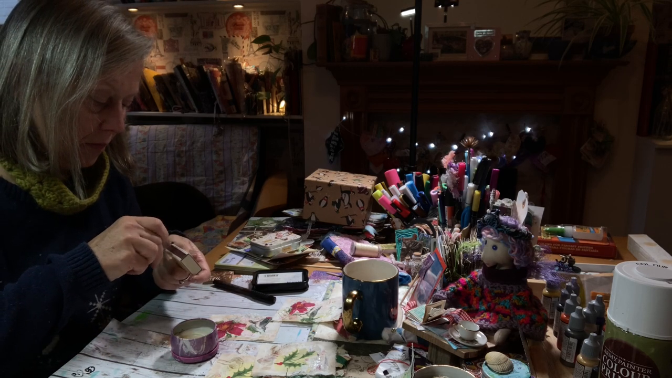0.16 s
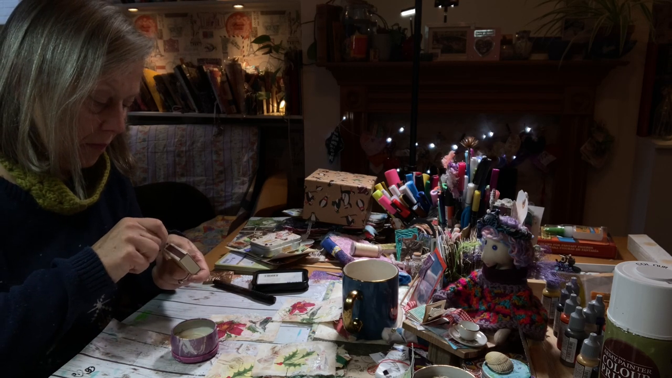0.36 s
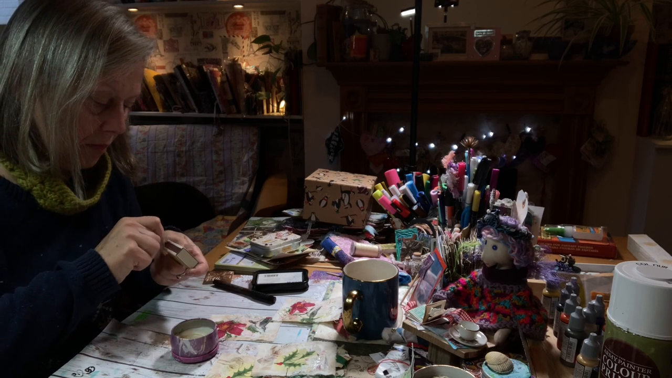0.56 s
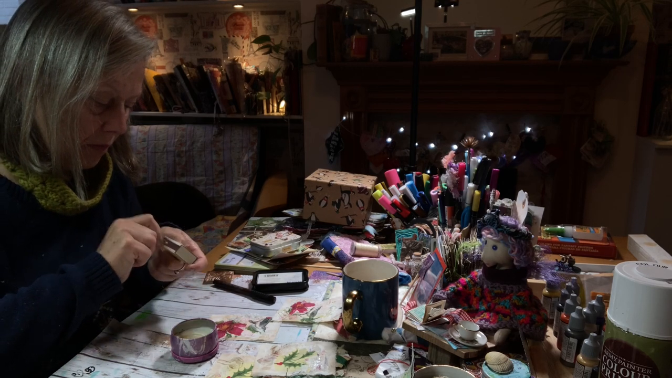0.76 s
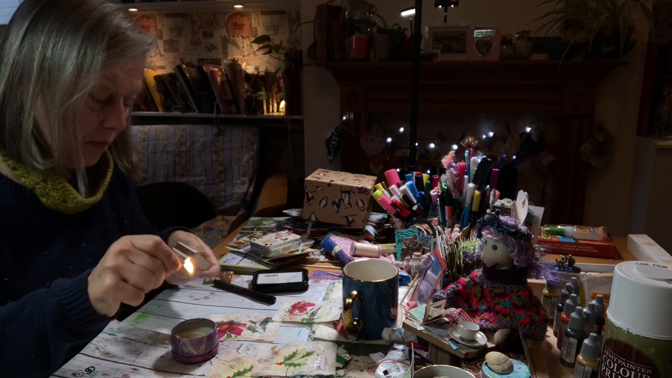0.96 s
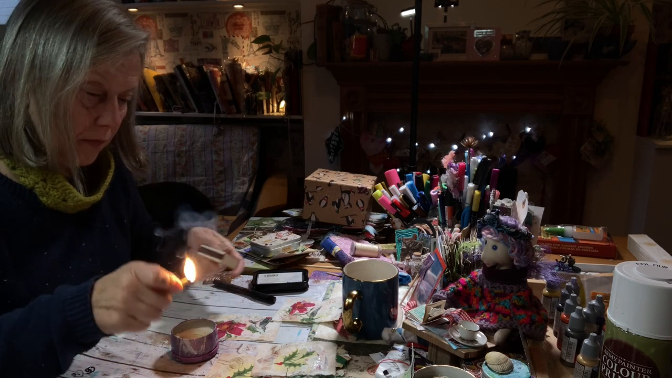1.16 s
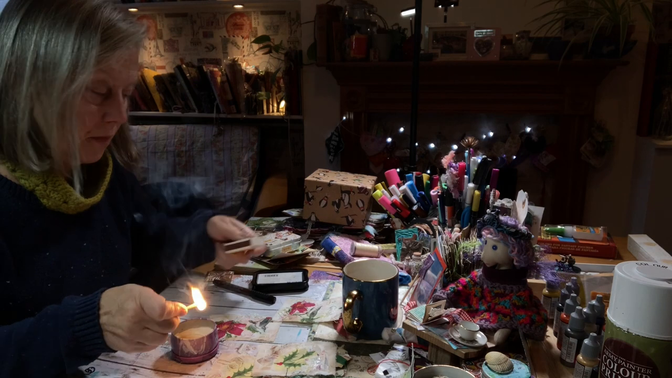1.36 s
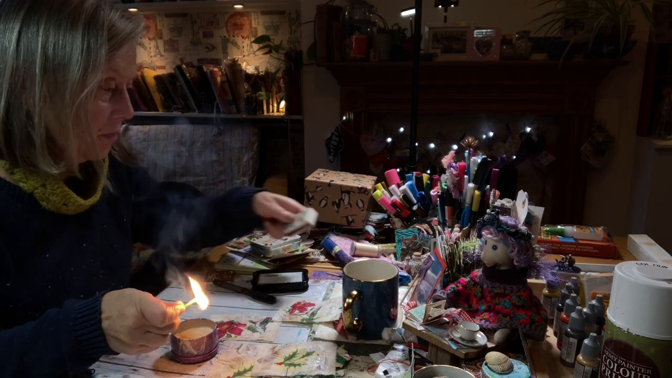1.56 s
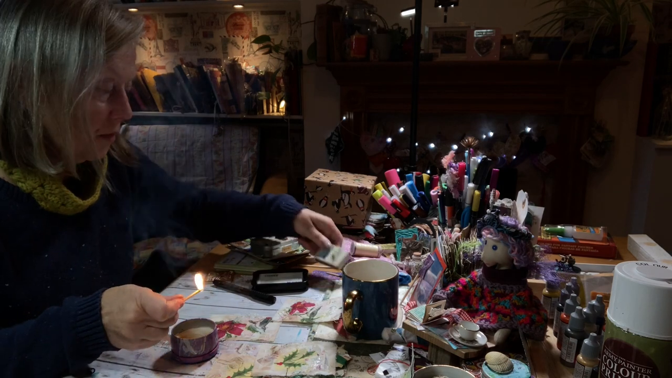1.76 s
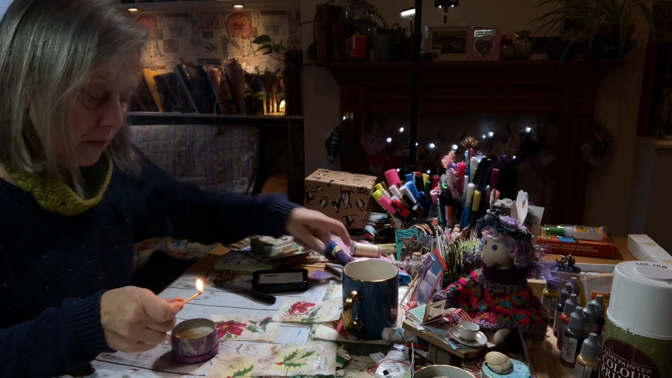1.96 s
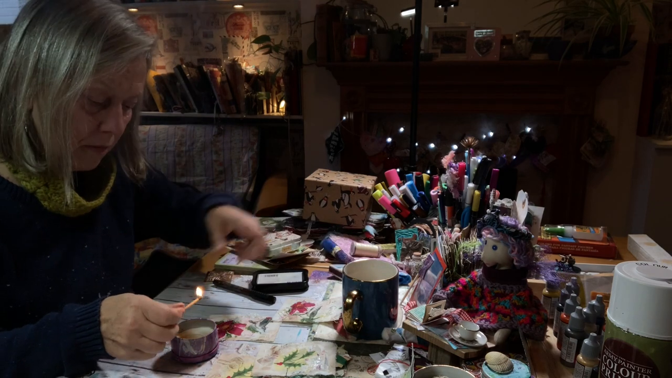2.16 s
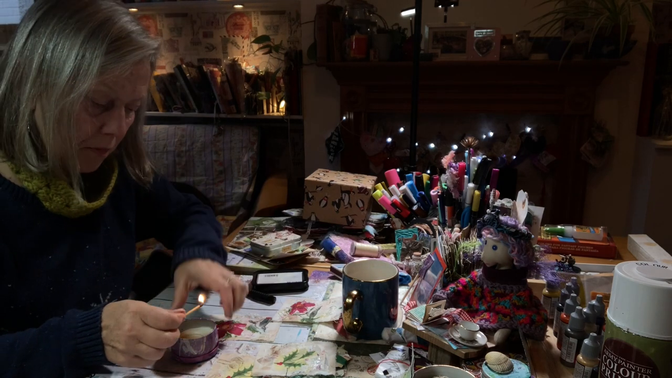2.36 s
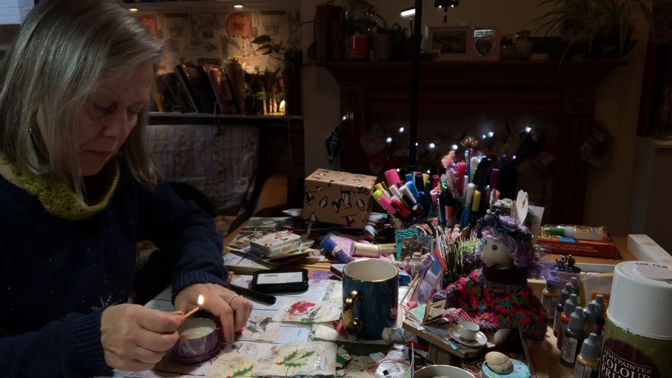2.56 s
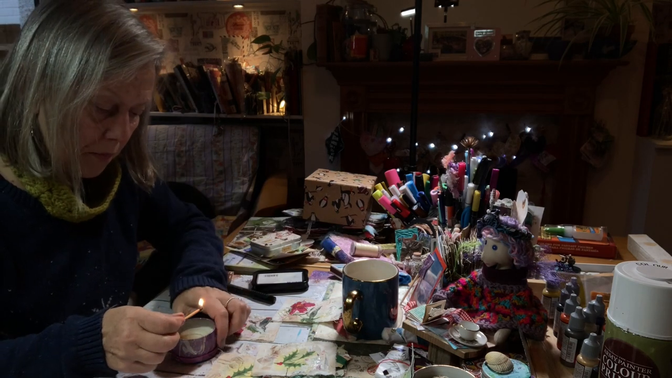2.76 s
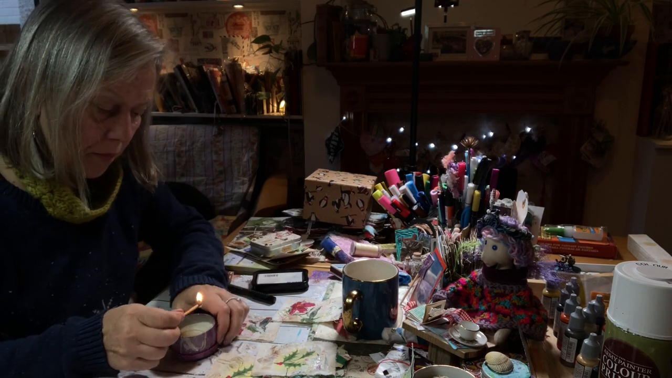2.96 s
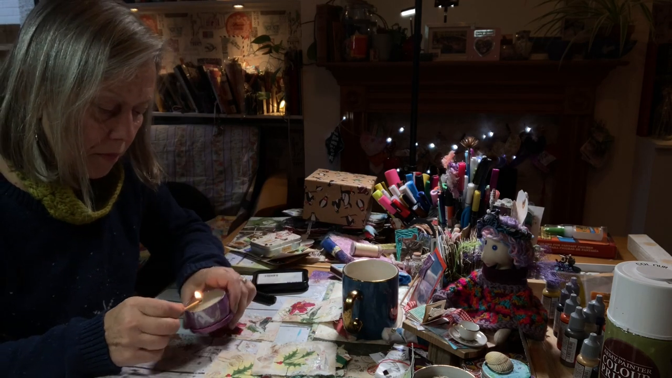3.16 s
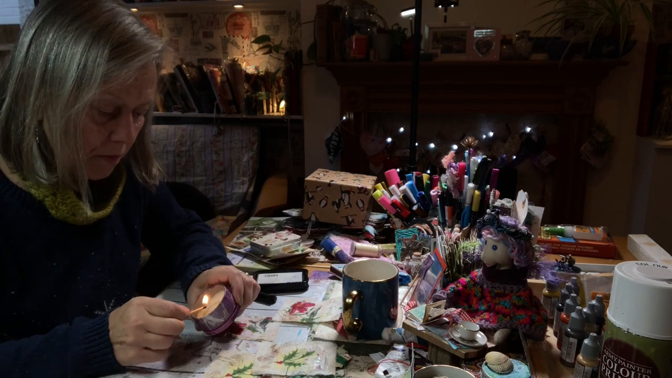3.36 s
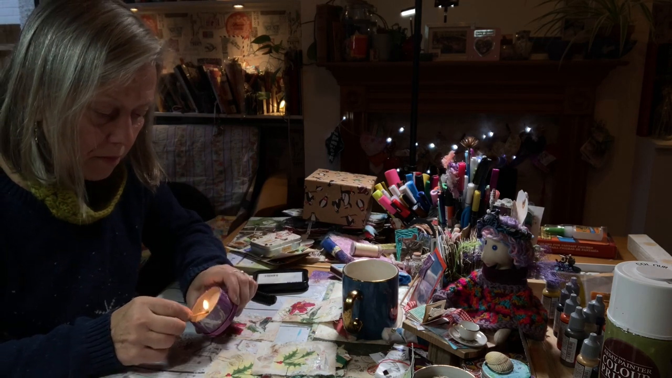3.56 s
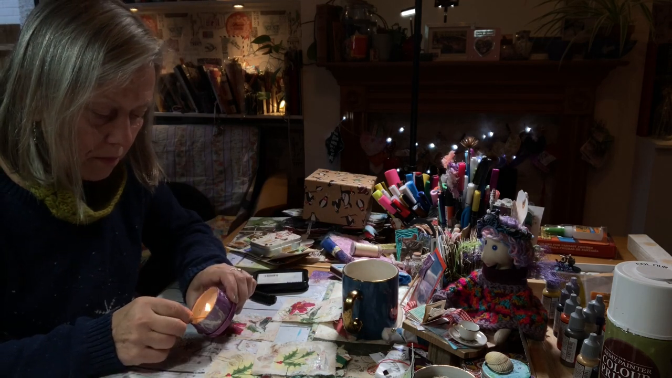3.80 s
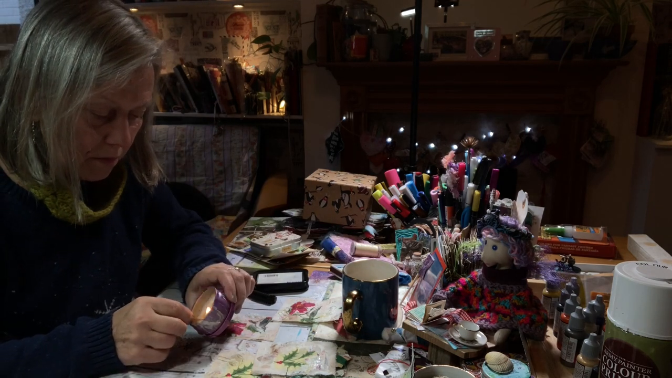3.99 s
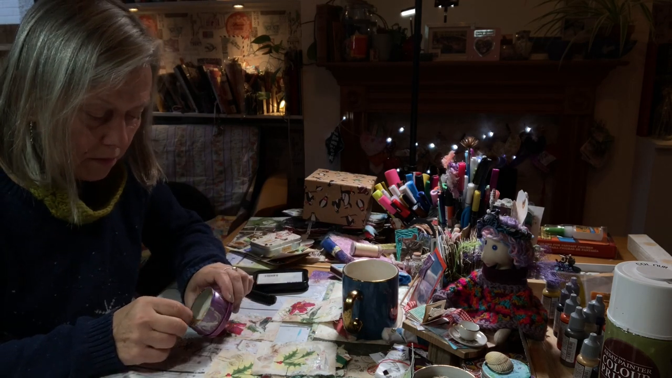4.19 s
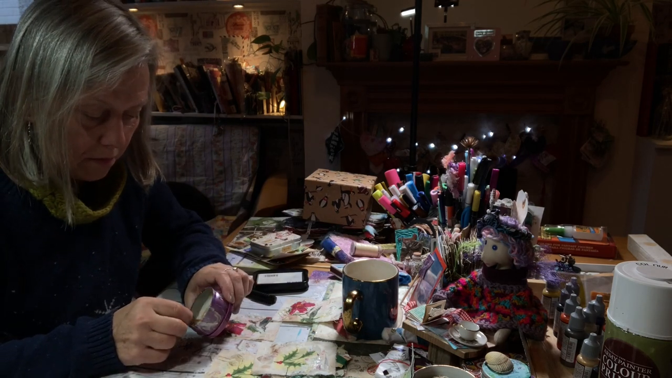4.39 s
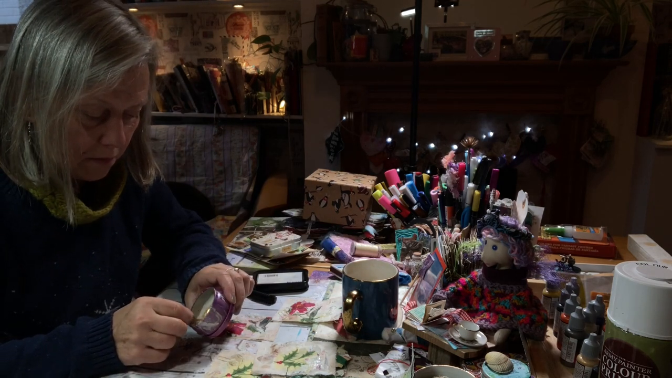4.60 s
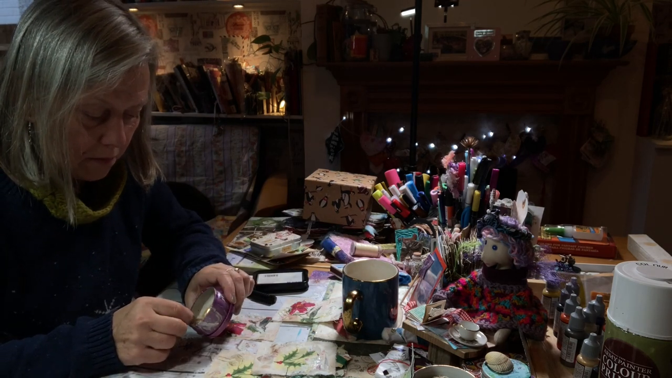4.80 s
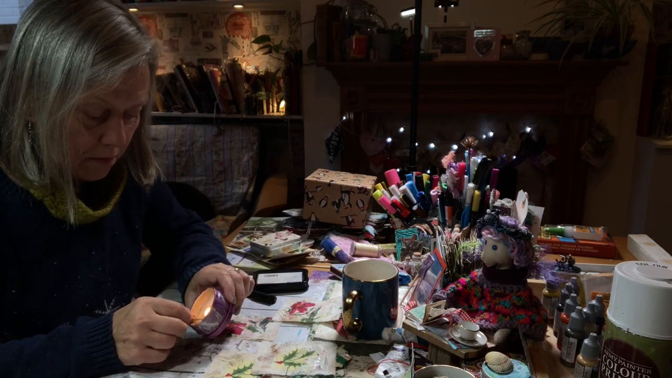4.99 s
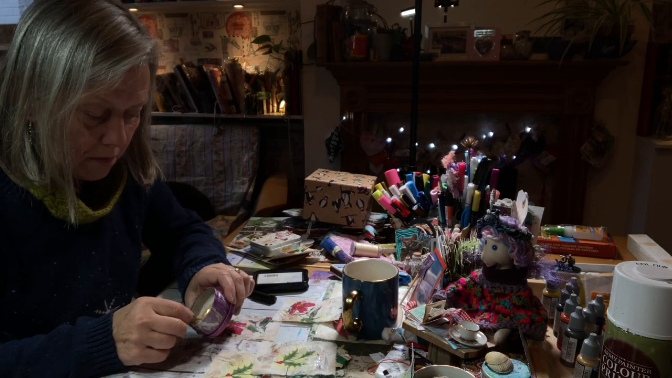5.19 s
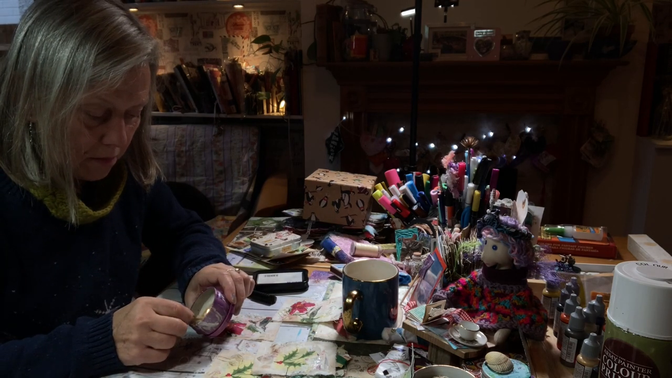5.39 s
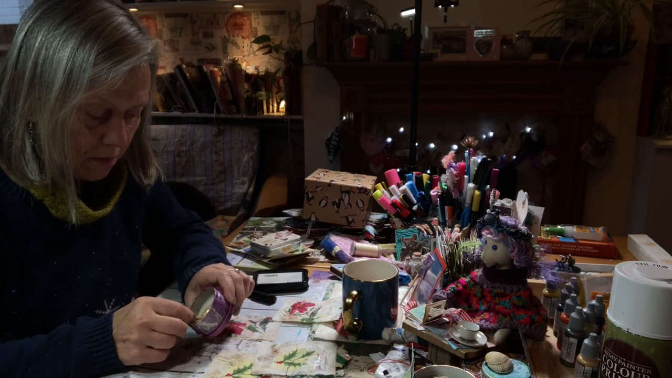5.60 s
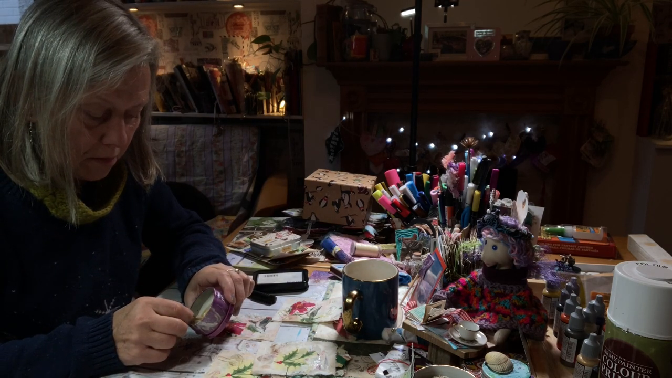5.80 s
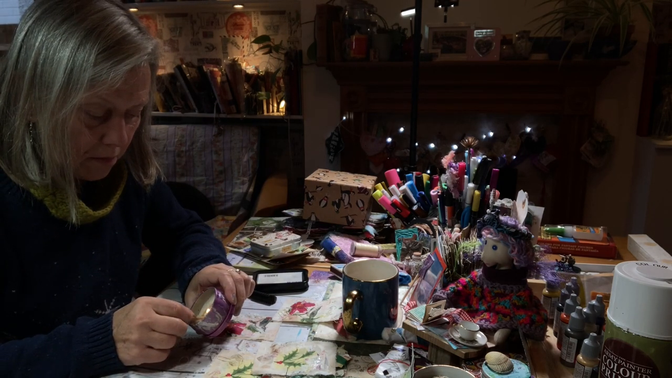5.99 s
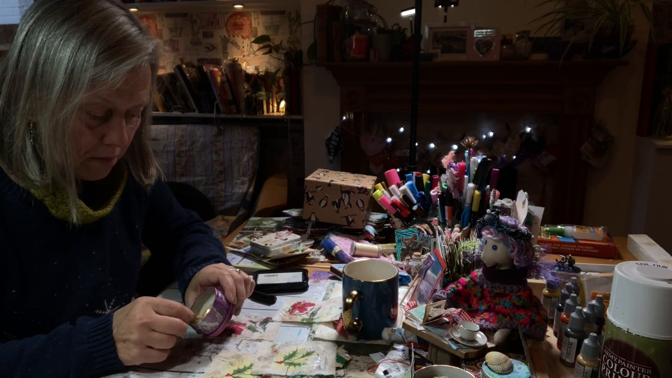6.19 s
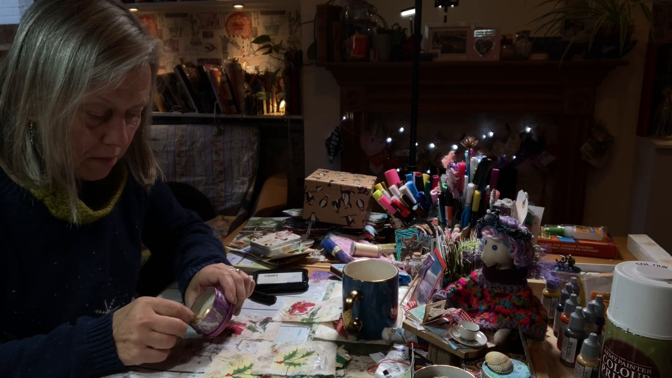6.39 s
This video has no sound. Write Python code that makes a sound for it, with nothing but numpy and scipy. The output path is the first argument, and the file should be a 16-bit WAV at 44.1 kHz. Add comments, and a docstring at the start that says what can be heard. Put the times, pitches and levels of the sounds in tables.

```python
"""First comes the low noise of a small quiet room and one dry tick. Then a wooden match scrapes over
the grit on its box, catches with a puff, and hisses as gas bursts from the burning head.
The cardboard box is put down and then nudged along, and a hand bumps the table. Fingers pick up a
tin candle, whose thin wall rings, and the matchstick taps against it.
Everything echoes briefly in the room and is heard through a small stereo recorder."""
import sys
import numpy as np
from scipy import signal
from scipy.fft import rfft, irfft, next_fast_len
from scipy.io import wavfile

SR = 44100
rng = np.random.default_rng(int(sys.argv[2]) if len(sys.argv) > 2 else 0)


def pcm_store(signal):
    """Save signal as 16-bit PCM."""
    levels = np.round(np.clip(np.atleast_2d(signal), -1, 1) * 32767)
    wavfile.write(sys.argv[1], SR, levels.astype(np.int16).T)


N = 284445
TIME = np.arange(N) / SR


def from_db(db):
    """Turn decibels into a number to multiply by."""
    return 10 ** (np.asarray(db) / 20)


def rms_one(x):
    """Scale a sound so its average strength (rms) is 1."""
    return x / np.sqrt(np.mean(x ** 2) + 1e-20)


def at_hz(points, hz):
    """Read between the rows of a table, spacing frequencies by octaves."""
    freqs, values = np.transpose(points)
    return np.interp(np.log(hz + 1e-6), np.log(freqs), values)


def bins(x):
    """List the frequencies in a sound's spectrum."""
    return np.fft.rfftfreq(x.shape[-1], 1 / SR)


def colour(x, tone):
    """Shape a steady sound's lows and highs by a tone table; strength 1."""
    size = next_fast_len(x.shape[-1])
    gains = from_db(at_hz(tone, np.fft.rfftfreq(size, 1 / SR)))
    return rms_one(irfft(rfft(x, size) * gains, size)[..., :N])


def cut(x, hz, keep, order=2):
    """Keep the "low" or the "high" side of a frequency."""
    return signal.sosfilt(signal.butter(order, min(hz, .45 * SR), keep, fs=SR, output="sos"), x)


def ring(clicks, hz, ring_s):
    """Each click starts a pure tone that fades 60 dB in ring_s."""
    r, w = from_db(-60 / (ring_s * SR)), 2 * np.pi * hz / SR
    return signal.lfilter([0, np.sin(w)], [1, -2 * r * np.cos(w), r * r], clicks + 1e-18)


def resonance(x, hz, width_hz):
    """Let through one band of frequencies around hz."""
    r, w = np.exp(-np.pi * width_hz / SR), 2 * np.pi * hz / SR
    return signal.lfilter(np.array([1, 0, -1]) * (1 - r * r) / 2, [1, -2 * r * np.cos(w), r * r], x)


def grains(per_s, spread_db):
    """Tiny random clicks of uneven size; strength 1."""
    sizes = from_db(spread_db * np.minimum(rng.exponential(1, N), 4)) * rng.choice([-1, 1], N)
    return rms_one(sizes * (rng.random(N) < per_s / SR))


def struck(hits, tones):
    """Every hit rings all of an object's own tones, each a little differently."""
    starts, out = [round(s * SR) for s, db in hits], np.zeros(N)
    for k, (hz, tone_db, ring_s) in enumerate(tones):
        clicks = np.zeros(N)
        clicks[starts] = from_db(np.array(hits)[:, 1] + tone_db + rng.normal(0, 1, len(hits)))
        out += ring(clicks, hz, ring_s) * (-1) ** k
    return out


def envelope(s, db, rise_s, hold_s, fall_s):
    """Volume that climbs 60 dB per rise_s until time s, holds, then drops 60 dB per fall_s."""
    below = np.maximum(s - TIME, 0) / rise_s + np.maximum(TIME - s - hold_s, 0) / fall_s
    return from_db(db - 60 * np.minimum(below, 4))


def swell(s, db, half_s):
    """Volume that swells and fades in a bell shape around time s."""
    return from_db(db) * np.exp(-np.minimum(((TIME - s) / half_s) ** 2, 40))


def flicker(rate_hz):
    """Drift to a new random value rate_hz times a second."""
    steps = rng.standard_normal(1024)
    return np.interp(TIME * rate_hz, np.arange(len(steps)), rms_one(steps))


def waver(x, depth, rate_hz, width_share=0.094):
    """Make narrow bands of a sound swell and sink, each on its own."""
    centres = np.geomspace(700, 14000, 14)
    return x + depth * sum(resonance(x, hz, width_share * hz) * flicker(rate_hz) for hz in centres)


# how alike the room sounds on the left and right: (frequency [Hz], likeness [0-1])
LEFT_RIGHT_LIKENESS = [(60, 0.8), (200, 0.9), (500, 0.3), (1500, 0.08), (3500, 0), (6000, 0.3), (8500, 1),
                       (15000, 1)]
def diffuse(size):
    """Stereo noise that arrives from all sides."""
    mid, side = rng.standard_normal((2, size))
    alike = np.clip(at_hz(LEFT_RIGHT_LIKENESS, bins(mid)), 0, 1)
    return irfft(np.sqrt(1 + alike) * rfft(mid) + np.sqrt(1 - alike) * rfft(side) * [[1], [-1]], size)


# the tone of the quiet room: (frequency [Hz], level [dB])
ROOM_TONE = [(20, -16.5), (40, -6.5), (75, 3), (130, -2), (210, -4), (350, -12.5), (700, -17.5),
             (1300, -23.5), (3000, -28), (5000, -30.5), (7000, -32), (9000, -30), (13000, -32.5),
             (15000, -34.5)]
def room_noise():
    """A faint, low, steady noise fills the room."""
    return from_db(-60.5) * colour(diffuse(next_fast_len(N)), ROOM_TONE)


# dry snaps of wood, card and fingers: (time [s], level [dB], pitch [Hz], added crack [dB])
DRY_TICKS = [(0.398, -33, 2870, -3), (0.724, -55.5, 5000, -3.5), (1.724, -58, 3500, 4),
             (1.9233, -26, 9100, -1.5), (1.9355, -41, 8500, -12), (1.981, -32.5, 3290, -2.5),
             (1.981, -42, 8240, -14), (2.2, -47, 8600, -11), (2.441, -45.5, 947, 3),
             (2.45, -27.5, 8600, -0.5), (2.4547, -30.5, 4830, -5), (2.4564, -48.5, 970, -22.5),
             (2.4608, -47, 960, -5), (2.5005, -36.5, 9100, -2), (2.616, -63, 1055, -10),
             (2.7453, -49, 1960, -22), (2.7451, -49.5, 1000, -20.5), (2.8887, -45, 4630, -3),
             (3.2716, -39.5, 1063, -28), (3.272, -36.5, 2350, -19), (3.2723, -43.5, 4030, -21),
             (3.48, -50.5, 9650, -8), (5.663, -36, 12900, -18), (5.6934, -44, 13000, -13),
             (5.7378, -45, 12840, -12), (5.741, -56, 4800, -5), (5.8652, -60, 4800, 6)]
def ticks(crack_s=0.001, knock_s=0.0023, ring_cycles=17, overtone_ratio=1.275):
    """Each tick is a bright crack, a duller knock and two short tones of the thing touched."""
    out, t = np.zeros(N), TIME[:SR // 8]
    click = signal.unit_impulse(len(t))
    for s, db, hz, crack_db in DRY_TICKS:
        noise = rng.standard_normal((2, len(t)))
        crack = cut(noise[0] * np.exp(-t / crack_s), 3000, "high")
        knock = cut(noise[1] * np.exp(-t / knock_s), 2600, "low")
        knock = cut(knock, 450, "high", order=1)
        knock_db = -6 * np.log2(hz / 1820)  # higher ticks have less knock
        ring_s = ring_cycles / hz
        tones = ring(click, hz, ring_s) - from_db(-6) * ring(click, hz * overtone_ratio, ring_s)
        tick = tones + from_db(crack_db) * crack + from_db(knock_db) * knock
        start = round(s * SR)
        out[start:start + len(t)] += from_db(db) * tick
    return out


# the dull scratch of the first light touch: (frequency [Hz], level [dB])
DRAG_TONE = [(200, -16), (650, -9.5), (1100, 0), (2400, -3.5), (3700, 0), (5500, -12.5), (8500, -8.5),
             (10500, -13.5), (15000, -9)]
# the bright scratch as the head bites the grit: (frequency [Hz], level [dB])
BITE_TONE = [(150, -18), (400, -7), (650, -7), (950, -15.5), (1300, -12.5), (1750, -13.5), (2500, -10),
             (3500, -11.5), (5000, -15), (7200, -8), (8400, -2.5), (10500, -6.5), (14000, -5), (15500, -4)]
# the ringing of stick and box: (pitch [Hz], width [Hz], level [dB])
STICK_RING = [(1283, 20, 10), (2286, 60, 4.5), (2569, 13, 6), (3229, 22, 6), (3410, 20, 5), (3856, 27, 3),
              (8283, 30, 3.5), (8470, 51, 7.5), (8850, 63, 2), (9290, 48, 3), (13400, 38, 3),
              (14072, 26, 7)]
def strike():
    """The match head drags lightly, then tears over the grit; stick and box ring along."""
    grit = grains(per_s=13000, spread_db=2.05)
    drag = colour(grit, DRAG_TONE) * envelope(0.7635, db=-30, rise_s=.016, hold_s=.007, fall_s=.02)
    bite = colour(grit, BITE_TONE) * envelope(0.7723, db=-9, rise_s=.018, hold_s=.0085, fall_s=.011)
    scrape = drag + bite
    return scrape + sum(from_db(db) * resonance(scrape, hz, width) for hz, width, db in STICK_RING)


# the head catches, then the flame spreads: (time [s], level [dB], rise [s], hold [s], fall [s])
PUFF_STAGES = [(0.784, -26, 0.0605, 0.02206, .075), (0.801, -40, .06, 0.041, 0.43)]
# the tone of the puff of gas: (frequency [Hz], level [dB])
PUFF_TONE = [(30, -24), (78, 3), (98, -3), (126, 7.5), (200, -5.5), (310, 1), (600, -4), (850, -6),
             (1400, -1.5), (3200, -3), (5500, -6), (9000, -9), (15000, -10)]
def ignition():
    """The head catches fire with a spitting puff of gas."""
    puff = colour(grains(per_s=5400, spread_db=3.5), PUFF_TONE)
    return puff * sum(envelope(*stage) for stage in PUFF_STAGES)


# pockets in the head flare up: (time [s], level [dB], half length [s], pitch [Hz], width [Hz])
POCKET_SPURTS = [(0.792, -36, .008, 115, 110), (0.807, -36.5, .005, 330, 449),
                 (1.024, -52, 0.016, 1650, 700), (1.185, -73, 0.013, 5000, 7000),
                 (1.295, -60, 0.034, 400, 510), (1.517, -51.5, 0.028, 455, 700),
                 (1.304, -60, 0.029, 2350, 2200), (1.537, -70, .03, 13900, 2500),
                 (1.62, -64, .025, 13700, 2500), (1.658, -53, 0.009, 300, 400)]
def spurts(pores):
    """Each pocket of gas briefly lifts one band of the flame's sputter."""
    return sum(rms_one(resonance(resonance(pores, hz, width), hz, width)) * swell(s, db, half_s)
               for s, db, half_s, hz, width in POCKET_SPURTS)


# the flame's hollow tone beside box and cupped hand: (frequency [Hz], level [dB])
CUPPED_TONE = [(60, -4), (200, -0.5), (550, -2), (1050, -7), (1600, 3.5), (2400, -7.5), (3400, -9.5),
               (4500, -3), (5200, -7), (7300, -10), (8400, -8), (10300, -10), (12500, -11), (15000, -13)]
# its tone in the open air: (frequency [Hz], level [dB])
OPEN_TONE = [(60, -8), (200, -0.5), (550, -4.5), (1200, -11), (1700, -6.5), (2500, -4), (3400, -6),
             (4500, -11), (5200, -16), (6100, -7), (8000, -16.5), (9300, -14), (12000, -26), (15000, -25)]
# the match moves away from the box: (time [s], openness [0-1])
MOVE_AWAY = [(1.16, 0.3), (1.31, 0.96)]
# the high hiss rises and dips as the head sputters: (time [s], level [dB])
HISS_LEVELS = [(.95, -7.5), (1.05, -0.5), (1.17, -0.5), (1.25, -2), (1.35, 1), (1.44, -4), (1.54, -2.5),
               (1.61, -4.5), (1.67, -7.5)]
def flare(roar_below_hz=1200, hiss_above_hz=4500, sputter_db=1.2, sputter_hz=45, mid_burn_s=1.5):
    """Gas bursts from countless tiny pores in the head; the hiss fades as the flame's roar grows."""
    pores = grains(per_s=6700, spread_db=3.0)
    pores *= from_db(sputter_db * rms_one(cut(rng.standard_normal(N), sputter_hz, "low")))
    pores += from_db(-11) * grains(per_s=80, spread_db=3.0)  # crackles
    openness = np.clip(np.interp(TIME, *np.transpose(MOVE_AWAY)), 0, 1)
    gas = (1 - openness) * colour(pores, CUPPED_TONE) + openness * colour(pores, OPEN_TONE)
    gas = waver(gas, depth=0.32, rate_hz=18)
    # split the gas into a low roar, a middle fizz and a high hiss
    low, below_hiss = [irfft(rfft(gas) / (1 + (bins(gas) / edge) ** 8), N)
                       for edge in (roar_below_hz, hiss_above_hz)]
    roar = rms_one(low) * from_db(-2 + 6 * (TIME - mid_burn_s))
    fizz = rms_one(below_hiss - low) * from_db(-0.92 - 1.5 * (TIME - mid_burn_s))
    hiss = rms_one(gas - below_hiss) * from_db(np.interp(TIME, *np.transpose(HISS_LEVELS)))
    burn = envelope(0.92, db=-49.5, rise_s=0.13, hold_s=0.718, fall_s=0.16)
    return (roar + fizz + hiss) * burn + spurts(pores)


# fingers and stick brush box and tin: (time [s], level [dB], half length [s])
SCUFF_SWELLS = [(1.842, -69.5, 0.015), (2.632, -69, 0.027), (2.782, -67, 0.015), (3.481, -66.5, 0.015),
                (4.986, -48, 0.0083), (5.77, -76, .02)]
# their raspy tone: (frequency [Hz], level [dB])
SCUFF_TONE = [(100, -12), (300, -22), (700, -2), (1300, -5.5), (1800, 4), (2400, -1), (4500, -5),
              (7000, -8), (10000, -8), (15000, -14)]
def scuffs():
    """Many tiny slips blend into short dry rubs."""
    rasp = colour(grains(per_s=3000, spread_db=4.0), SCUFF_TONE)
    return rasp * sum(swell(*scuff) for scuff in SCUFF_SWELLS)


# the ringing of the cardboard box: (pitch [Hz], level [dB], ring time [s])
BOX_RING = [(201.6, -14.5, 0.19), (289, -10.5, 0.036), (400, -11.5, 0.048), (680, -4.5, 0.022),
            (850, -5, 0.011), (1158, 1.5, 0.037), (1384, 0, 0.024), (1654, -12, 0.038), (2000, -2, 0.0077),
            (2490, -8, 0.021), (2614, -12, 0.075), (3130, -5, 0.012)]
# a faint, brief rub swells into the landing; the later rows are the box sliding:
# (time [s], level [dB], half length [s], ring pitch [Hz], added ring [dB])
BOX_RUBS = [(1.92, -64, 0.0059, 1190, 7), (1.97, -48, 0.048, 1870, -4.5), (2.081, -56, 0.026, 1310, -8.5),
            (2.136, -50.5, 0.018, 1350, -10.5), (2.188, -62, 0.011, 1200, -0.5),
            (2.246, -56.5, 0.0058, 1640, 3), (2.256, -54.5, 0.0076, 1300, -8),
            (2.276, -59, 0.013, 1520, -10.5)]
# the tone of card rubbing on the table: (frequency [Hz], level [dB])
RUB_TONE = [(30, -35), (70, 10), (110, 13.5), (230, 7), (330, 0.5), (520, -1), (800, -7), (1200, 0.5),
            (1500, 1), (2100, -23), (3100, -15), (5000, -31), (14000, -34)]
def matchbox(landing_s=1.9232, landing_db=-26.5, first_gap_s=.0011, gap_growth=2.6, loss_db=2.5):
    """A faint rub leads in, the box lands edge by edge, and small sliding slips ring its walls."""
    delays = np.cumsum([0, *(first_gap_s * gap_growth ** np.arange(3))])
    edges = [(landing_s + delay, landing_db - loss_db * k) for k, delay in enumerate(delays)]
    slips = grains(per_s=2800, spread_db=4.5)
    rub, rubs = colour(slips, RUB_TONE), np.zeros(N)
    for s, db, half_s, hz, ring_db in BOX_RUBS:
        walls = from_db(ring_db) * rms_one(resonance(slips, hz, width_hz=130))
        rubs += (rub + walls) * swell(s, db, half_s)
    return struck(edges, BOX_RING) + rubs


# a hand or the sliding box knocks the table: (time [s], level [dB])
TABLE_BUMPS = [(2.252, -58), (2.272, -59), (2.4425, -50), (2.4565, -43.5), (2.473, -47), (2.5003, -58),
               (4.9895, -48)]
# the ringing of the table top: (pitch [Hz], level [dB], ring time [s])
TABLE_RING = [(198, -3.5, 0.057), (284, -1.5, 0.084), (400, -0.5, 0.028), (677, 0.5, 0.022)]
def table_bumps():
    """A hand, and the box as it slides, bump the table, and the top answers with low thuds."""
    return struck(TABLE_BUMPS, TABLE_RING)


# fingers lift the candle tin: (time [s], level [dB])
TIN_LIFT = [(2.7818, -39.5)]
# the ringing of the tin: (pitch [Hz], level [dB], ring time [s])
TIN_RING = [(1004, -6, 0.018), (1280, -12, 0.028), (1793, -10, 0.021), (2260, -4.5, 0.016), (2770, -9, .02),
            (4200, -6, 0.0065), (5160, 0, 0.008), (8700, -5.5, 0.014)]
def candle_tin():
    """The tin's thin wall rings briefly as it is picked up."""
    return struck(TIN_LIFT, TIN_RING)


# the matchstick touches the candle: (time [s], level [dB])
STICK_TAPS = [(4.6662, -47.5), (4.903, -54.5), (4.9835, -42), (4.9872, -47), (4.9891, -31), (4.9909, -49),
              (4.9954, -44), (5.2777, -56.5), (5.771, -63)]
# the hollow ring of those taps: (pitch [Hz], level [dB], ring time [s])
TAP_RING = [(308, -17, 0.049), (1070, -6.5, 0.0067), (1780, -2.5, 0.019), (2080, -7.5, 0.012),
            (2440, -6, 0.016), (3560, -15, 0.011), (4060, -15, 0.015), (4800, -10, .007),
            (7500, -16.5, 0.011)]
def stick_taps():
    """The matchstick taps inside the candle, making short hollow clicks."""
    return struck(STICK_TAPS, TAP_RING)


# how long the room's echo takes to fade 60 dB: (frequency [Hz], fade time [s])
ECHO_FADE = [(100, 0.35), (500, 0.34), (2500, 0.36), (8000, 0.35), (15000, 0.13)]
def room(x, echo_db, fade_share=1, first_echo_s=0.0015, build_s=0.0018):
    """Add echoes; the highs die first. A smaller fade_share makes the echo die sooner and sound dry."""
    t = TIME[:SR // 2]
    noise, tail = rfft(diffuse(len(t))), 0
    for hz, fade_s in ECHO_FADE:
        band = at_hz([(row_hz, row_hz == hz) for row_hz, _ in ECHO_FADE], bins(t))
        tail = tail + irfft(noise * band, len(t)) * from_db(-60 * t / (fade_s * fade_share))
    onset = np.clip((t - first_echo_s) / build_s, 0, 1)
    tail = rms_one(tail * onset) / np.sqrt(len(t))
    return x + from_db(echo_db) * signal.fftconvolve(x[None], tail, axes=1)[:, :N]


def pan(x, right_db):
    """Make the right side louder than the left."""
    return x * from_db([[-right_db / 2], [right_db / 2]])


def scene():
    """Match, box and candle at the table, over the room's own noise."""
    match = room(strike(), echo_db=-7) + room(ignition(), echo_db=-1)
    flame = room(flare(), echo_db=-5)
    box = room(matchbox(), echo_db=-2.5)
    fingers = room(ticks() + scuffs() + candle_tin() + table_bumps(), echo_db=-5, fade_share=0.62)
    taps = room(stick_taps(), echo_db=-3, fade_share=0.58)
    return pan(match + room_noise(), 0.8) + pan(flame + fingers + taps, 1.2) + pan(box, 1.3)


def record(dry, bottom_hz=29, top_hz=15900, lag_s=.000196, lag_above_hz=3800):
    """The recorder cuts the deepest bass and the very top; the highs on the right lag a little."""
    left, right = cut(dry, bottom_hz, "high", order=3)
    phase_lag = 2 * np.pi * lag_s * np.maximum(bins(dry) - lag_above_hz, 0)
    right = irfft(rfft(right) * np.exp(-1j * phase_lag), N)
    top_cut = signal.ellip(10, .2, 70, top_hz, fs=SR, output="sos")
    return signal.sosfilt(top_cut, np.clip([left, right], -1, 1))


dry = scene()
out = record(dry)
pcm_store(out)
```